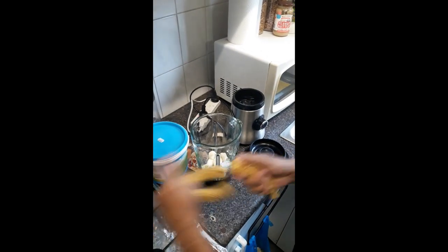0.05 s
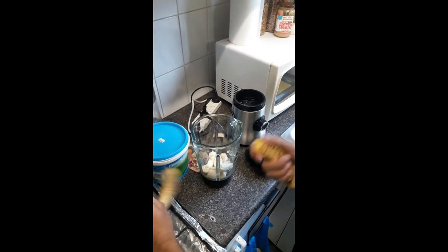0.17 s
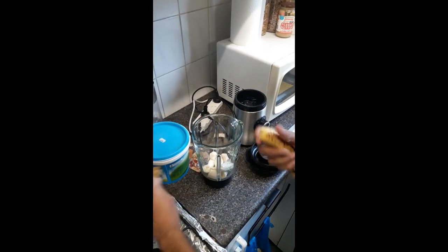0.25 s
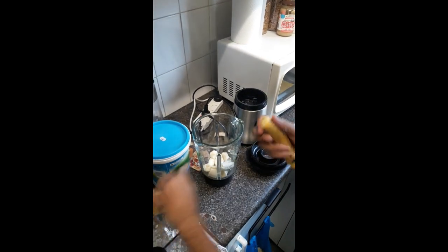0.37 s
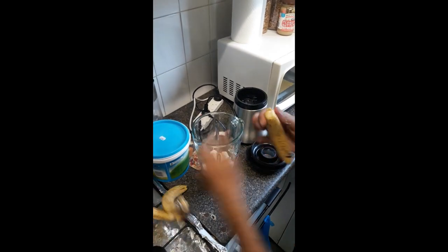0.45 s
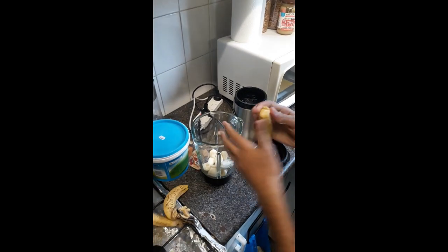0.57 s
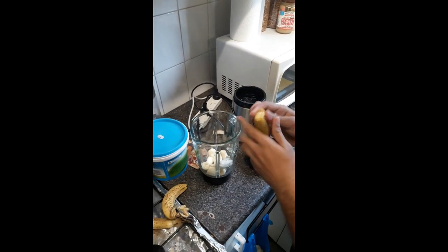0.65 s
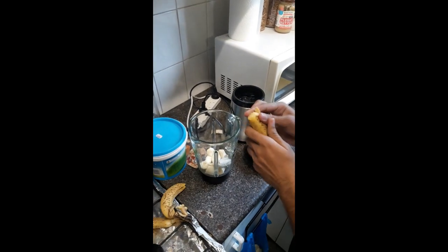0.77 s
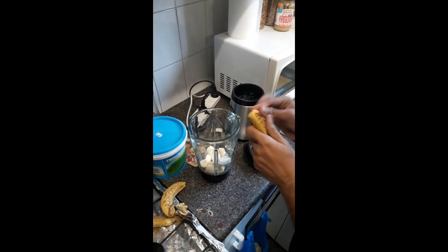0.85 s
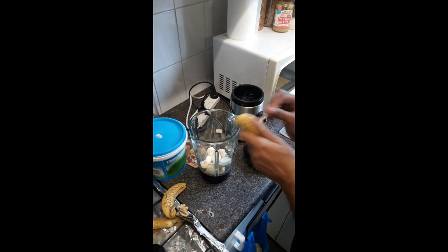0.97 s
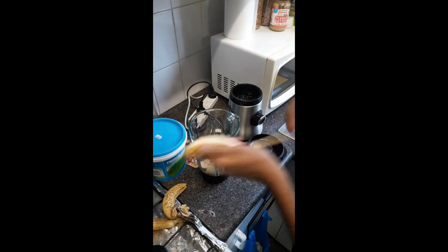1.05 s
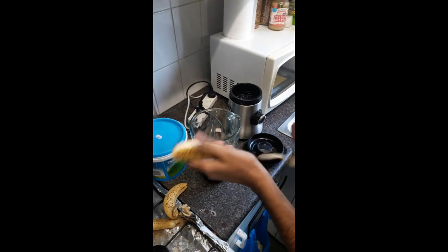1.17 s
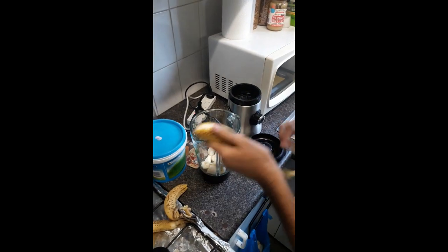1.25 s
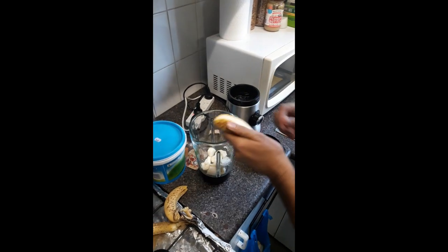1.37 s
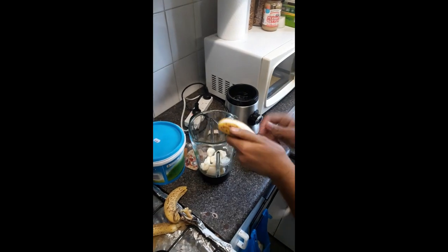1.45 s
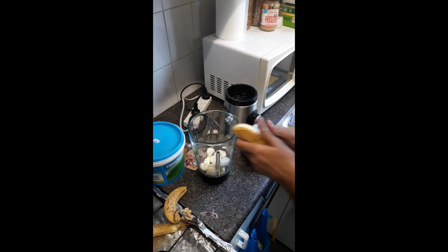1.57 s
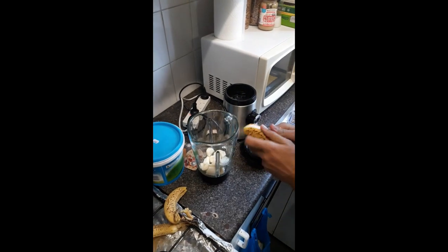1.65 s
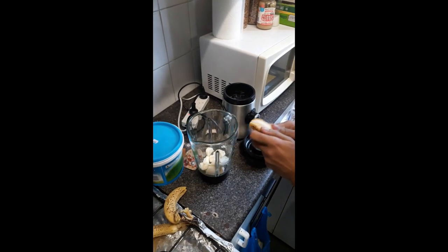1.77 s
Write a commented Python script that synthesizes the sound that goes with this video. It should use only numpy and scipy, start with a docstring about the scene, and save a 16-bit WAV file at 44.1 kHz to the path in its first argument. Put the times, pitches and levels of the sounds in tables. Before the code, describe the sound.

Banana peel drops softly on a metal tray, which clanks briefly; dull hand bumps and crisp tearing of a stem follow, then quiet peeling and a late knock. Close phone microphone, mono, faint room air.

```python
"""Peel rustles and ticks faintly, then a banana peel flops onto a foil-lined metal tray, which clanks.
The next banana's stem cracks open in two crisp tears and a strip of peel is pulled down softly.
A light knock on the counter ends the quiet, over faint air in a small tiled kitchen.
Impacts are filtered bursts, tears are random fibre breaks, tray and counter are decaying sines."""
import sys
import numpy as np
from scipy import signal
from scipy.fft import rfft, irfft
from scipy.io import wavfile

SR = 44100
rng = np.random.default_rng(int(sys.argv[2]) if len(sys.argv) > 2 else 0)


def output_pcm(signal):
    """Save a mono or channel-first signal as 16-bit PCM at the path in sys.argv[1].

    Samples are clipped to [-1, 1] before scaling.
    """
    pcm = np.clip(np.atleast_2d(signal).T, -1, 1) * 32767
    wavfile.write(sys.argv[1], SR, np.round(pcm).astype(np.int16))


N = 79380
T = np.arange(N) / SR

# Soft landings of the peel. Each row: start in s, relative level in dB, contact time in ms.
FLOP_ROWS = [(.2215, -15.5, 0.28), (.225, 6, 2.9), (.229, -1.5, 0.28), (.236, -2, 0.36), (.247, 0, 0.2),
             (.262, -5, .3), (.326, -6, 3.5)]
# Flop spectrum. Each row: frequency in Hz, gain in dB.
FLOP_GAINS = [(30, -43.5), (60, -27.5), (105, -3), (180, -11.5), (250, -5.5), (520, -5.5), (640, -7),
              (950, -4.5), (2000, -9.5), (3500, -9.5), (6500, -9), (9000, -30.5), (15500, -23.5)]


def peel_flop():
    """Soft peel meets the tray in many tiny contacts: short swells of filtered noise."""
    force = squashes(FLOP_ROWS, squash_s=0.0039)
    return amp(22.5) * kitchen(colour(force, FLOP_GAINS), wet_db=3.5)


# Rattling blows of the tray. Each row: start in s, relative level in dB, contact time in ms.
CLANK_ROWS = [(.280, -5, 0.033), (.2832, -2.5, 0.0084), (.2864, -1.5, 0.32), (.2888, 1.5, 0.071),
              (.301, -5.5, 0.35), (.3075, 4.5, 0.24), (.344, -3.5, 0.35), (.377, -15.5, 0.042)]
# Clank spectrum. Each row: frequency in Hz, gain in dB.
CLANK_GAINS = [(40, -38), (140, -18), (280, -11), (380, -4.5), (540, -3), (650, -12), (950, -4.5),
               (1400, -6), (2200, -6.5), (3200, -4.5), (5000, -5), (6700, -5.5), (8000, -17), (9000, -29.5),
               (15500, -23.5)]


def tray_clank():
    """The tipping tray strikes hard: each blow is a push plus chatter."""
    force = blows(CLANK_ROWS, chatter_s=0.0088, chatter_db=6)
    return amp(14) * kitchen(colour(force, CLANK_GAINS), wet_db=2)


# Tray modes. Each row: frequency in Hz, relative level in dB, t60 in s.
TRAY_MODES = [(106.1, -38.5, 0.14), (240.7, -27, 0.63), (369.6, -15.5, 0.14), (485.8, -14, 0.39),
              (508, -17.5, 0.15), (562, -22.5, .3), (735, -30.5, 0.26), (846, -25.5, 0.25),
              (1024, -27, .36), (1115, -33.5, .55), (1326, -26.5, 0.16), (1613, -27.5, 0.46),
              (2747, -25.5, 0.14), (3254, -26.5, .28), (3326, -9.5, .165), (6500, -21.5, .13)]
# What excites the tray. Each row: start in s, swell in s, level in dB, frequency of half excitation in Hz.
TRAY_EXCITATIONS = [(.223, 0.019, -5, 797.4), (.284, 0.011, 0.5, 12000)]


def tray_ring():
    """The soft flop wakes mainly the tray's low modes; the clank wakes them all."""
    out = np.zeros(N)
    for start_s, swell_s, strength_db, reach_hz in TRAY_EXCITATIONS:
        for hz, mode_db, t60_s in TRAY_MODES:
            rolloff = 1 / (1 + (hz / reach_hz) ** 4)
            out += amp(strength_db + mode_db) * rolloff * ring(hz, t60_s, start_s, swell_s)
    return out


# Stem tears. Each row: start in s, hold in s, relative level in dB, attack in s, release in s.
SNAP_ROWS = [(.563, 0.0074, -4, 0.004, 0.0055), (.586, 0.004, -4, .004, 0.0039),
             (.629, 0.0054, -31, 0.0051, 0.006), (.649, 0.014, 0, 0.0071, 0.01),
             (.683, 0.011, -1.5, 0.004, 0.0042), (.706, .006, -29, 0.0026, .01),
             (.76, 0.034, -44.5, .01, .01)]
# Tear spectrum. Each row: frequency in Hz, gain in dB.
SNAP_GAINS = [(100, -21), (700, -17), (1400, -12), (2000, -8), (2500, -10), (3100, -2), (4400, 2),
              (6500, 2.5), (7800, -5), (9000, -15), (12000, -11), (15500, -8.5)]


def stem_snap():
    """The stem cracks crisply: dense fibre breaks in short pulls."""
    breaks = fibres(SNAP_ROWS, breaks_per_s=3000, spread_db=2)
    return amp(-26) * kitchen(colour(breaks, SNAP_GAINS), wet_db=-2.5)


# Strip pulls. Each row: start in s, hold in s, relative level in dB, attack in s, release in s.
STRIP_ROWS = [(.012, 0.028, 2.5, 0.021, .02), (.16, 0.08, -10.5, 0.025, .01),
              (.885, 0.017, 1.5, 0.022, 0.047), (1.025, 0.017, 2, 0.033, 0.0097),
              (1.06, 0.042, 2, 0.0074, 0.022), (1.14, 0.03, -6.5, 0.021, .02)]
# Strip spectrum. Each row: frequency in Hz, gain in dB.
STRIP_GAINS = [(100, 0), (400, -3), (700, -7), (2100, 1), (2500, -11), (3000, 4.5), (4500, 1.5), (6500, -2),
               (9000, -19.5), (12000, -19.5), (15500, -11.5)]


def strip_pull():
    """Peel strips come away in a softer rustle of sparser fibre breaks."""
    breaks = fibres(STRIP_ROWS, breaks_per_s=960, spread_db=1.5)
    return amp(-58) * kitchen(colour(breaks, STRIP_GAINS), wet_db=-3.5)


# Knock on the counter. Each row: start in s, relative level in dB, contact time in ms.
KNOCK_ROWS = [(1.7122, -2, 0.044), (1.718, -9.5, 0.13), (1.732, -9, 0.048)]
# Knock spectrum. Each row: frequency in Hz, gain in dB.
KNOCK_GAINS = [(50, -42), (140, -21), (280, -10), (380, -0.5), (510, -0.5), (720, -10.5), (1200, -8),
               (1700, -14.5), (2300, -21.5), (3100, -10.5), (4200, -10.5), (6000, -16.5), (7500, -19),
               (9000, -33.5), (15500, -32)]


def counter_knock():
    """A light knock: hard blows with little chatter."""
    force = blows(KNOCK_ROWS, chatter_s=0.003, chatter_db=-2)
    return amp(4.5) * kitchen(colour(force, KNOCK_GAINS), wet_db=4)


# Counter modes. Each row: frequency in Hz, level in dB, t60 in s.
COUNTER_MODES = [(302.5, -36, 0.11), (484.5, -34.5, 0.19), (564.6, -39.5, 0.095), (1121, -48.5, 0.36),
                 (1690, -65, 0.26), (3140, -51.5, 0.18)]


def counter_ring():
    """The counter's modes ring briefly from the first blow of the knock."""
    start_s = KNOCK_ROWS[0][0]
    return sum(amp(db) * ring(hz, t60_s, start_s, swell_s=0.0014) for hz, db, t60_s in COUNTER_MODES)


# Bumps of the hands on the fruit. Each row: start in s, relative level in dB, contact time in ms.
BUMP_ROWS = [(.04, -11, 1.6), (.075, -16, 1.9), (.466, 8, 4.2), (.535, 3, .8), (.545, -1, 0.14),
             (.562, -0.5, 1.05), (.592, 3, 7.4), (.611, 6, 7.3), (.66, 2.5, 3.3), (.70, -0.5, 1.43),
             (.77, -13, 3.4), (.866, -11, .5), (.891, -8, 0.3), (.935, -10, 1.07), (.97, -13, 2.54)]
# Bump spectrum. Each row: frequency in Hz, gain in dB.
BUMP_GAINS = [(30, -34.5), (60, -14.5), (120, -1.5), (200, -2.5), (330, 4.5), (520, -3), (800, -7.5),
              (1300, -6.5), (1900, -0.5), (2500, -13.5), (4000, -7.5), (6500, -3.5), (9000, -36.5),
              (15500, -25.5)]


def hand_bumps():
    """Hands press soft fruit: short swells of filtered noise."""
    force = squashes(BUMP_ROWS, squash_s=0.011)
    return amp(2.5) * kitchen(colour(force, BUMP_GAINS), wet_db=-1.5)


# Small sticky ticks. Each row: start in s, relative level in dB, contact time in ms.
TICK_ROWS = [(.036, -1.5, .03), (.049, -23, 0.034), (.251, -4, .005), (.378, -0.5, 0.0071),
             (.44, -10, 0.011), (.493, -11.5, .005), (.761, -26, 0.0085), (.788, -21.5, .005),
             (1.164, -22, .02)]
# Tick spectrum. Each row: frequency in Hz, gain in dB.
TICK_GAINS = [(100, -8.5), (750, -16), (1500, -1.5), (1950, -10.5), (2600, -2), (4000, -0.5), (6200, -1),
              (8500, -20), (11000, -18.5), (15500, -8)]


def sticky_ticks():
    """Sticky contacts let go in very short chattering clicks."""
    force = blows(TICK_ROWS, chatter_s=0.0023, chatter_db=4)
    return amp(-12) * kitchen(colour(force, TICK_GAINS), wet_db=-1)


def low_hum():
    """A faint low mode swells during the bumps and lingers as a decaying sine."""
    return amp(-46.5) * ring(hz=142, t60_s=0.92, start_s=.58, swell_s=.025)


# Air spectrum. Each row: frequency in Hz, relative density in dB.
AIR_GAINS = [(25, -16), (85, 6), (160, 1), (300, -6.5), (650, -8.5), (1000, 2.5), (1250, -2.5),
             (1650, -16.5), (2600, -18.5), (4500, -17), (6300, -18.5), (8500, -29.5), (15500, -27)]


def kitchen_air():
    """Filtered noise whose level wavers slowly at random."""
    waver_db, knots_per_s = 3, 1.5
    knots_s = np.arange(24) / knots_per_s
    waver = amp(waver_db * np.interp(T, knots_s, rng.standard_normal(len(knots_s))))
    air = unit(colour(rng.standard_normal(N), AIR_GAINS))
    return amp(-72) * waver * air


def squashes(rows, squash_s):
    """A soft landing is a brief swell of tiny contacts, duller the longer each lasts."""
    out = np.zeros(N)
    grain = even_noise()
    for start_s, db, contact_ms in rows:
        age = np.maximum(T - start_s, 0) / squash_s
        shape = np.sqrt(age) * np.exp(-2 * age)
        out += amp(db) * soften(grain * shape / np.linalg.norm(shape), contact_ms)
    return out


def blows(rows, chatter_s, chatter_db):
    """A hard blow is a one-sample push plus decaying noise chatter, softened by the contact."""
    out = np.zeros(N)
    t = T[:SR // 10]
    for start_s, db, contact_ms in rows:
        chatter = rng.standard_normal(len(t)) * np.exp(-t / chatter_s)
        force = amp(chatter_db) * chatter / np.linalg.norm(chatter)
        force[0] += 1
        i = int(start_s * SR)
        out[i:i + len(t)] += amp(db) * soften(force, contact_ms)[:N - i]
    return out


def fibres(rows, breaks_per_s, spread_db):
    """Fibres break at random, with uneven strength, while the peel is pulled."""
    pull = np.zeros(N)
    for start_s, hold_s, db, attack_s, release_s in rows:
        rise = np.minimum(T - start_s, 0) / attack_s
        fall = np.maximum(T - start_s - hold_s, 0) / release_s
        pull += amp(db) * np.exp(rise - fall)
    sizes = amp(spread_db * np.minimum(rng.exponential(size=N), 4))
    breaks = rng.random(N) < breaks_per_s / SR
    signs = rng.choice([-1, 1], N)
    return pull * unit(breaks * sizes * signs)


def ring(hz, t60_s, start_s, swell_s):
    """One mode swells linearly, then dies away exponentially."""
    age_s = np.maximum(T - start_s, 0)
    swell = np.minimum(age_s / swell_s, 1)
    decay = np.exp(-np.log(1000) * np.maximum(age_s - swell_s, 0) / t60_s)
    return swell * decay * np.sin(2 * np.pi * (hz * age_s + rng.random()))


def soften(x, contact_ms):
    """A longer contact takes away more treble: one-pole lowpass."""
    keep = np.exp(-1000 / (SR * contact_ms))
    return signal.lfilter([1 - keep], [1, -keep], x)


# Reverberation time of the kitchen. Each row: frequency in Hz, t60 in s.
ROOM_T60_S = [(100, 0.62), (250, 0.59), (600, 0.39), (1500, 0.2928), (4000, 0.2783), (7000, 0.2339),
              (15000, 0.2234)]


def kitchen(x, wet_db, bands=14):
    """Direct sound plus the tiled room's noise tail, which lasts longest in the bass."""
    delay_s, build_s = 0.0022, 0.0017
    hz = np.fft.rfftfreq(N, 1 / SR)
    centres_hz = np.geomspace(60, 16000, bands)
    spectrum = rfft(even_noise())
    tail = np.zeros(N)
    for centre_hz, share in zip(centres_hz, np.eye(bands)):
        # overlapping triangular bands on log frequency
        weight = along(list(zip(centres_hz, share)), hz)
        decay = np.exp(-np.log(1000) * T / along(ROOM_T60_S, centre_hz))
        tail += irfft(spectrum * weight, N) * decay
    tail *= 1 - np.exp(-np.maximum(T - delay_s, 0) / build_s)
    return x + amp(wet_db) * signal.fftconvolve(x, tail / np.linalg.norm(tail))[:N]


def even_noise(passes=3):
    """Noise with power evened over time and frequency, like a dense mix of reflections."""
    x = rng.standard_normal(N)
    for _ in range(passes):
        z = signal.stft(x, nperseg=1024)[2]
        x = signal.istft(z / (abs(z) + 1e-12))[1][:N]
    return unit(x)


def colour(x, points):
    """Causal minimum-phase filter with the given (Hz, dB) response, by folded cepstrum."""
    size = 4096
    cepstrum = irfft(np.log(amp(along(points, np.fft.rfftfreq(size, 1 / SR)))))
    cepstrum[1:size // 2] *= 2
    cepstrum[size // 2 + 1:] = 0
    return signal.fftconvolve(x, irfft(np.exp(rfft(cepstrum))))[:N]


def along(points, hz):
    """Interpolate (Hz, value) points on a log-frequency axis."""
    f, v = np.array(points, float).T
    return np.interp(np.log(np.maximum(hz, 1)), np.log(f), v)


def amp(db):
    """Decibels to gain."""
    return 10 ** (np.asarray(db) / 20)


def unit(x):
    """Scale to an rms of one."""
    return x / np.sqrt(np.mean(x ** 2))


def scene():
    """Sum all sources over the kitchen's faint air, as one channel."""
    tray = peel_flop() + tray_clank() + tray_ring()
    peeling = stem_snap() + strip_pull()
    counter = counter_knock() + counter_ring()
    handling = hand_bumps() + sticky_ticks()
    return (tray + peeling + counter + handling + low_hum() + kitchen_air())[None]


def record(dry):
    """The phone drops the deepest bass, rounds the highest peaks and cuts the top."""
    bass_cut_hz, top_hz = 28, 15800
    thin = signal.sosfilt(signal.butter(2, bass_cut_hz, "high", fs=SR, output="sos"), dry)
    rounded = np.tanh(thin)
    return signal.sosfilt(signal.ellip(10, .2, 80, top_hz, fs=SR, output="sos"), rounded)


dry = scene()
out = record(dry)
output_pcm(out)
```